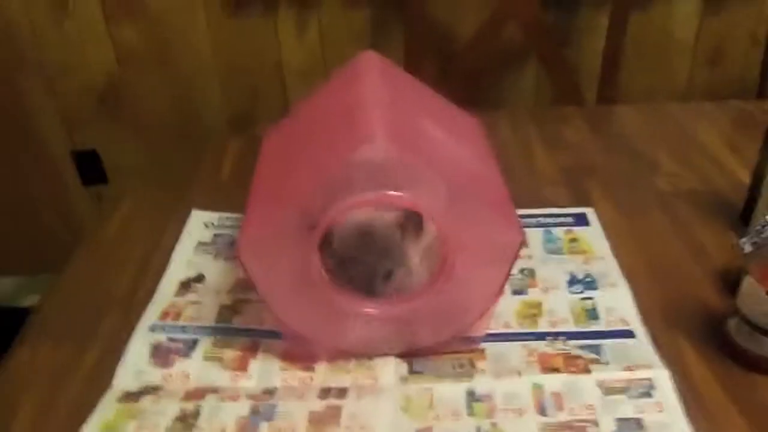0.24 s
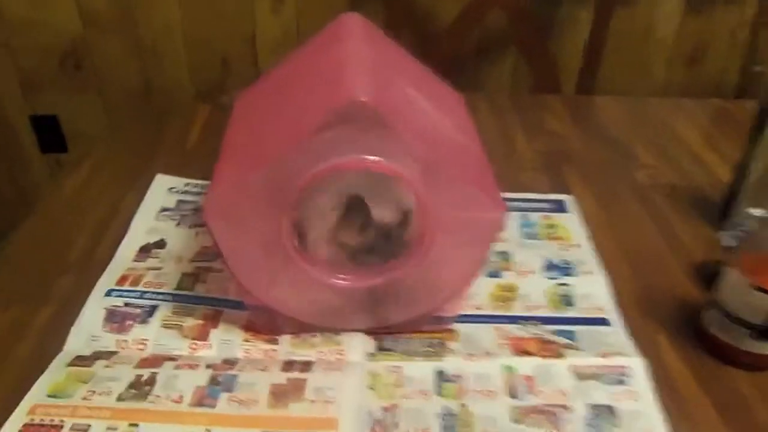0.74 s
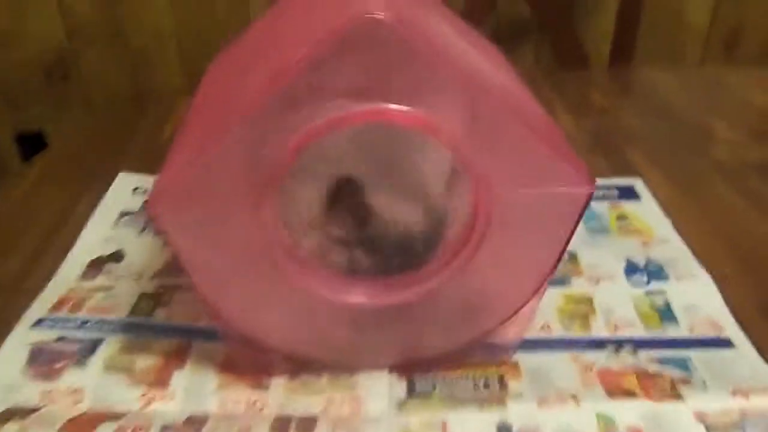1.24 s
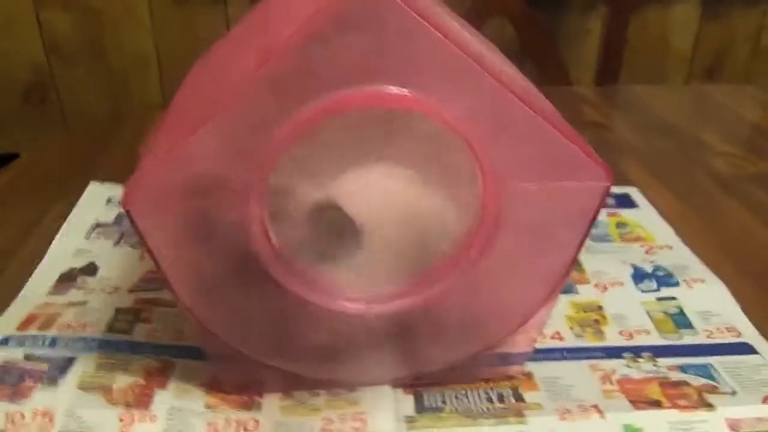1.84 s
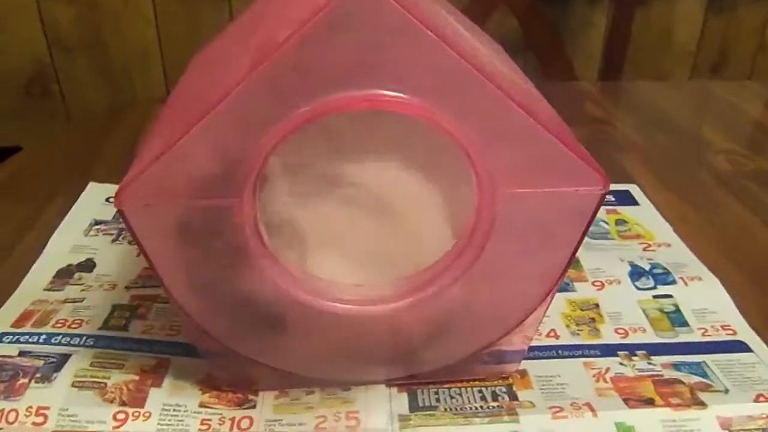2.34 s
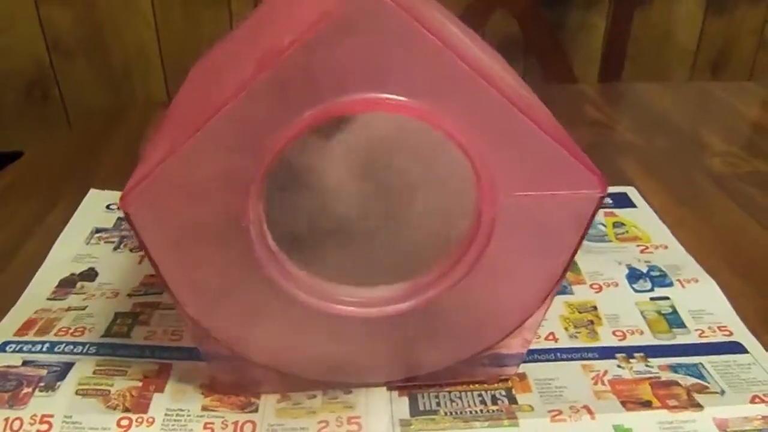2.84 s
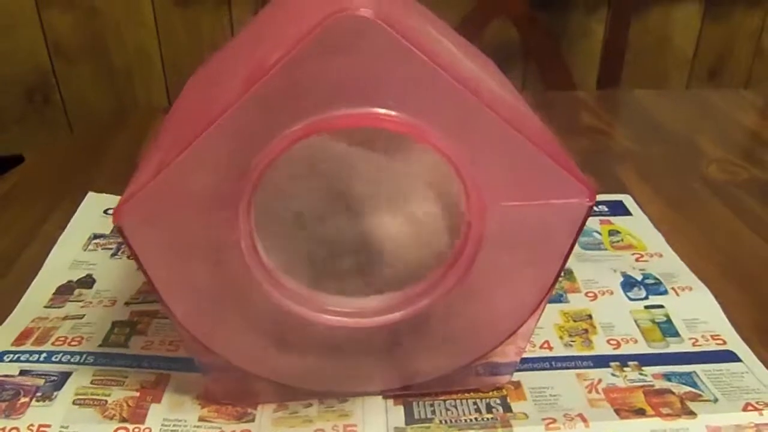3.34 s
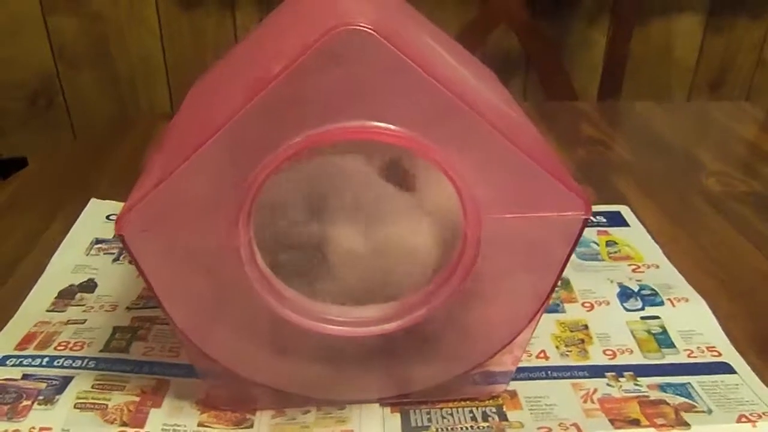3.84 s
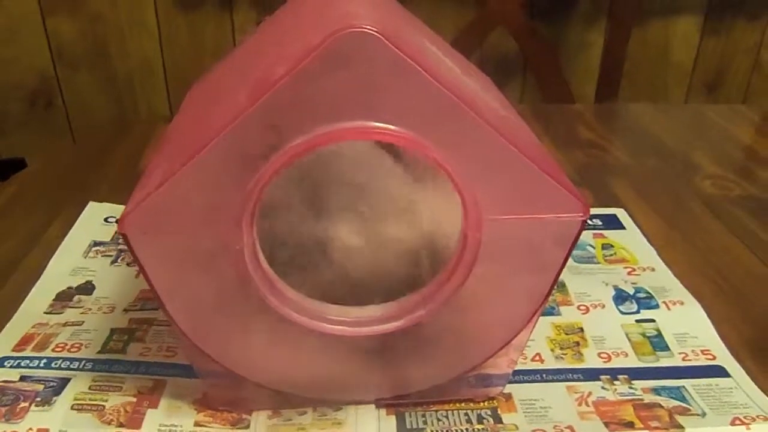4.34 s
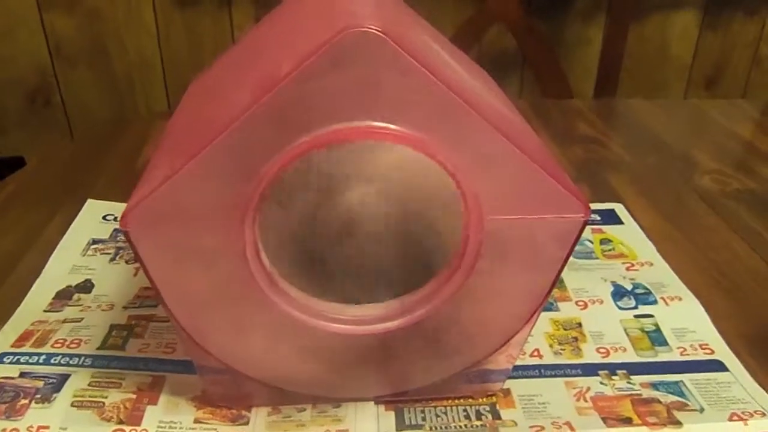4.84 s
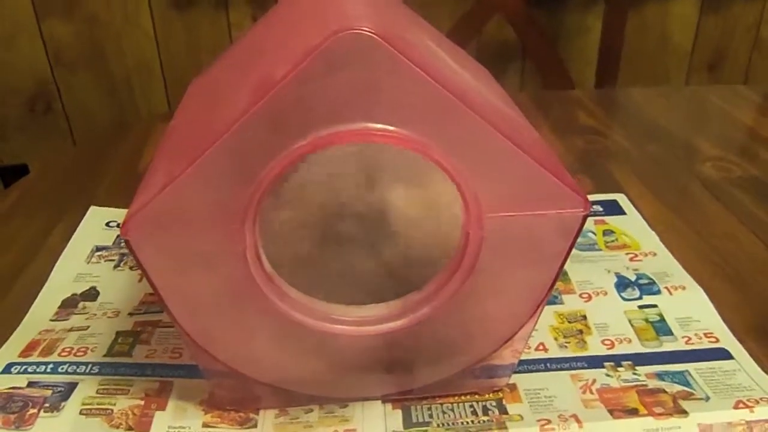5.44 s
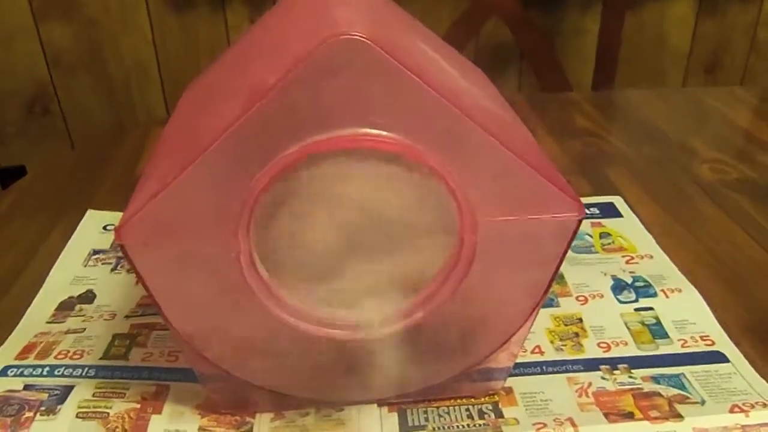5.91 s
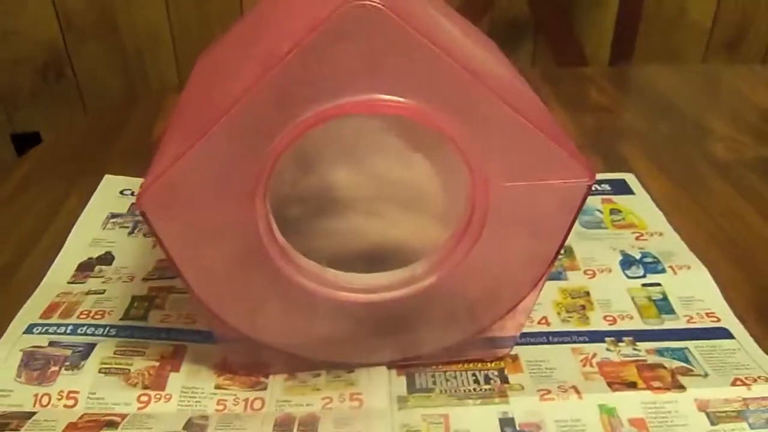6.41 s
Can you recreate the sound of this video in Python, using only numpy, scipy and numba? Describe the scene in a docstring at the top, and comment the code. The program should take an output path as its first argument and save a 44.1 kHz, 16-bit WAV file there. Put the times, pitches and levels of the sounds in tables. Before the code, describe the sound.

A chinchilla rolls in a plastic dust bath, making irregular hollow thumps, scratchy claw scrapes and soft hissing dust.

```python
"""A quiet room, a hollow plastic bath house on a table, a chinchilla rolling and scrabbling inside.
Body and feet thump the walls, which ring in a few low modes over the boom of the enclosed air.
Claws scrape and squeak, dust hisses against the plastic, grit ticks, a small metal thing tinkles once.
A dull scuff comes last. Short room echoes and a low room tone lie underneath."""
import sys
import numpy as np
from scipy import signal
from scipy.fft import rfft, irfft
from scipy.io import wavfile
from scipy.ndimage import uniform_filter1d
from numba import njit

SR = 44100
rng = np.random.default_rng(int(sys.argv[2]) if len(sys.argv) > 2 else 0)


def generate_wav(sig):
    """Save sig (samples, or channels by samples) to the path in sys.argv[1] as 16-bit PCM at SR."""
    pcm = np.round(np.clip(np.atleast_2d(sig).T, -1, 1) * 32767).astype(np.int16)
    wavfile.write(sys.argv[1], SR, pcm)


N = 294345
HOP = 40   # samples per step of slow curves

# body against wall: start_s, level_db, cavity_boom_db, hardness_db
THUMPS = [(.028, -20, -21, -1.5), (.085, -15.5, 1.5, 1.5), (.12, -25, -3, -5), (.15, -24.5, 10, 15),
          (.38, -34.5, -17, -2), (.494, -42, -4, -12), (0.657, -27.5, -16, -6), (.726, -31, 0, 3),
          (.811, -25.5, -4, 2), (.889, -22, -2, 1.5), (.95, -28, 9, 10), (1.027, -42, 12, 3),
          (1.153, -34, -6, 0), (1.238, -16.5, -1.5, 2), (1.307, -22.5, -5, 3), (1.437, -25.5, 1, -10),
          (1.552, -33.5, 13.5, -5), (1.599, -9.5, -12, 2.5), (1.652, -12, -13, 6), (1.707, -22.5, -27, 7),
          (1.756, -21, 2.5, -11), (1.79, -6.5, 0, 0), (1.808, -15, -22, 6), (1.827, -12, -9, -2),
          (1.898, -31, -8, 15), (1.977, -19, -0.5, 1), (2.077, -23.5, -8, -5), (2.311, -14.5, -2.5, 1.5),
          (2.341, -18.5, -1.5, 2), (2.486, -22, -19, -4), (2.587, -16.5, 1, -1), (2.645, -18.5, -9, -3),
          (2.696, -26.5, -13, -14), (2.757, -14.5, -24, 4.5), (2.788, -12, -1, 3), (2.858, -30.5, 4, 14),
          (2.937, -15, -20, 4), (2.968, -18.5, 2, -6), (3.051, -13, 7, -1.5), (3.227, -21, 4.5, 3),
          (3.321, -22.5, 6, 0.5), (3.376, -29, 8, 3), (3.408, -24.5, 4, 4), (3.531, -37.5, 12.5, -7),
          (3.601, -39, -12, -10), (3.805, -22, -0.5, -3.5), (3.932, -33.5, 9.5, -10), (3.997, -28, 2, 1),
          (4.051, -27.5, 7.5, 5), (4.195, -32, 13.5, -6), (4.338, -32, 6, 0.5), (4.415, -25.5, -29, -11),
          (4.524, -22, 6.5, -2), (4.609, -25.5, 8, -4), (4.652, -5, -14, 3), (4.699, -13.5, 2, 11),
          (4.797, -24, -12, -6), (4.888, -19, 3.5, 0), (4.97, -28, -4, 3), (5.113, -33, 4.5, -19),
          (5.162, -30, 6.5, -13), (5.221, -37, 15.5, -8), (5.298, -29.5, 12, 0), (5.397, -31.5, 13, -9),
          (5.481, -32, 0, -11), (5.594, -21.5, -12, -25), (5.678, -23, -8, -1), (5.76, -26.5, 1.5, -7),
          (5.808, -32, 3, 10), (5.857, -11.5, 0.5, 1.5), (6.01, -30.5, -3, -7), (6.088, -15, -5.5, -2),
          (6.159, -24.5, -17, -7), (6.191, -20.5, 6.5, 3), (6.256, -25.5, 12, 0), (6.492, -35.5, 5.5, -3)]
# house modes, the lowest being air breathing through the door: pitch_hz, gain_db, free_t60_s
HOUSE_MODES = [(142.4, -6, 0.38), (208, -12, 0.61), (230.1, -3.5, 0.32), (266.5, -1, 0.088),
               (278, 1, 0.029), (295.2, -6.5, 0.25), (332.7, -15, 0.4), (342.7, -10, 0.21),
               (420, -33, 0.29), (476, 0.5, 0.051), (528, -30, 0.34), (649, -11, 0.1), (763, -18.5, 0.21),
               (852, -6.5, 0.039), (982, -16, 0.12), (1100, -20, 0.11), (1300, -30, 0.18),
               (1330, -54, 0.099)]
# wall mode that blooms a moment after each blow: pitch_hz, gain_db, free_t60_s
LATE_MODE = (585.6, -14.5, 0.039)
# steady stirring between strokes: time_s, claws_db, dust_db, drag_db
STIR = [(0.0, -55.5, -53.5, -27), (0.43, -53, -57, -47), (0.62, -55, -58.5, -59), (0.85, -54, -56.5, -41.5),
        (1.36, -53.5, -53, -35), (1.8, -54, -49.5, -39), (2.12, -61.5, -60, -48), (2.93, -56.5, -56, -35.5),
        (3.2, -60.5, -62.5, -38), (3.7, -59, -60.5, -54), (3.9, -59, -59.5, -48), (4.17, -61.5, -64, -43),
        (4.4, -60, -57, -48), (4.75, -49.5, -49.5, -37), (5.07, -57, -60, -49), (6.08, -55, -52.5, -43),
        (6.3, -62.5, -63, -44), (6.67, -66, -67.5, -42.5)]
# paw and body strokes through the dust: start_s, length_s, claws_db, dust_db
STROKES = [(0.03, 0.068, -59, -54.5), (0.085, 0.13, -48, -50.5), (0.364, 0.03, -51.5, -51),
           (0.448, 0.044, -57.5, -53), (0.521, 0.028, -56.5, -47.5), (0.613, 0.048, -53, -62),
           (0.681, 0.12, -53.5, -52.5), (0.812, 0.064, -54, -51), (0.884, 0.034, -49, -52),
           (0.955, 0.14, -51.5, -49.5), (1.154, 0.04, -56, -54), (1.214, 0.093, -48, -49),
           (1.36, 0.09, -53, -52.5), (1.469, 0.083, -58.5, -48), (1.588, 0.03, -45.5, -50),
           (1.645, 0.051, -50, -44.5), (1.757, 0.096, -48.5, -45), (1.95, 0.042, -57, -57),
           (2.166, 0.031, -62, -57), (2.303, 0.079, -52.5, -59), (2.519, 0.018, -53.5, -56),
           (2.602, 0.089, -55, -54.5), (2.75, 0.094, -50.5, -56), (2.915, 0.06, -52, -56.5),
           (3.044, 0.096, -52.5, -56), (3.221, 0.02, -59, -65), (3.313, 0.13, -56, -60.5),
           (3.49, 0.07, -53, -56.5), (3.574, 0.03, -54, -55), (3.767, 0.023, -56, -59),
           (3.854, 0.13, -55, -54), (4.046, 0.036, -54, -57), (4.228, 0.1, -55.5, -63),
           (4.401, 0.035, -55, -71), (4.474, 0.072, -46, -50), (4.646, 0.041, -43.5, -51),
           (4.73, 0.17, -54, -54), (4.948, 0.027, -46.5, -56), (5.105, 0.049, -53.5, -57),
           (5.188, 0.079, -47.5, -50), (5.285, 0.091, -46.5, -48), (5.41, 0.026, -45.5, -50),
           (5.477, 0.13, -49.5, -55), (5.654, 0.033, -52, -65), (5.8, 0.027, -48, -50.5),
           (5.847, 0.097, -50, -56.5), (6.006, 0.071, -55.5, -38.5), (6.078, 0.12, -49.5, -46.5),
           (6.369, 0.032, -58.5, -70), (6.574, 0.077, -49, -65.5)]
# claw rasp colour: freq_hz, density_db
RASP_SPECTRUM = [(350, -17), (600, 1), (679, 0), (952, 2), (1070, 0.5), (1390, -2), (1550, 0.5), (2960, -2),
                 (3670, -4.5), (5000, -17.5), (6500, -11), (11000, -120)]
# wall modes rung by catching claws: pitch_hz, gain_db, t60_s
SCRATCH_MODES = [(1407, -27, 0.022), (2170, -30, 0.0058), (2960, -21.5, 0.007), (3460, -28, 0.0035)]
# dust hiss colour: freq_hz, density_db
DUST_SPECTRUM = [(2000, -15.5), (3500, -2), (5000, 2.5), (7000, 1.5), (9000, 1), (14000, -0.5),
                 (16000, -12)]
# puffs of the finest dust: start_s, length_s, top_lift_db
PUFFS = [(0.041, .04, 9), (0.377, .04, 5), (0.792, 0.07, 7.5), (5.798, 0.017, 10)]
# room tone colour: freq_hz, density_db
ROOM_SPECTRUM = [(12, -30), (20, 21.5), (65, 21.5), (386, -19), (522, -5), (1010, -2), (1250, -25),
                 (3370, -23.5), (3760, -18), (14000, -31)]
# grit and claw ticks: start_s, peak_db, centre_hz
TICKS = [(.031, -37, 2380), (.099, -28.5, 2600), (0.165, -26, 7500), (.389, -35, 5700), (.529, -33, 3120),
         (.74, -38, 4200), (.902, -32, 2000), (1.154, -32, 1710), (1.241, -37, 2200), (1.604, -27.5, 4000),
         (1.655, -37, 1600), (1.754, -34, 1300), (1.771, -40, 8200), (1.793, -24.5, 5500),
         (1.814, -22, 8800), (1.836, -22.5, 7500), (1.842, -28, 8200), (1.896, -30.5, 1530),
         (1.922, -32.5, 6400), (1.962, -32.5, 8900), (2.101, -40, 11500), (2.31, -34, 1900),
         (2.34, -25.5, 1330), (2.486, -39.5, 1400), (2.535, -33, 3880), (2.589, -34, 1180),
         (2.659, -27.5, 2810), (2.758, -27.5, 2700), (2.76, -31, 8000), (2.921, -34, 11300),
         (2.951, -40, 1200), (3.063, -40.5, 1100), (3.229, -35.5, 2600), (3.674, -37, 2720),
         (4.492, -29, 3300), (4.55, -31, 3270), (4.657, -19.5, 1300), (4.667, -19.5, 4470),
         (4.889, -33.5, 2600), (4.935, -33.5, 2800), (4.997, -36, 3200), (5.039, -27.5, 7850),
         (5.116, -40, 3600), (5.291, -29, 2600), (5.421, -31, 1700), (5.48, -35, 1500), (5.807, -33, 6100),
         (6.005, -22, 9300), (6.015, -18, 7600), (6.027, -17, 8500), (6.037, -16.5, 6960),
         (6.052, -18, 5400), (6.073, -25, 8000), (6.091, -24, 4130), (6.113, -29, 4600), (6.19, -42, 3300),
         (6.223, -32, 9800), (6.428, -41, 7100), (6.509, -46, 4800)]
# strikes on the metal thing: start_s, level_db
METAL_STRIKES = [(.132, -45), (0.151, -42), (0.167, -42), (.195, -48), (.21, -46)]
# its modes: pitch_hz, gain_db, t60_s
METAL_MODES = [(5310, -5, 0.11), (10070, -3, 0.15), (13300, -4, .06)]
# claw slips on the smooth wall: start_s, level_db, pitch_hz, length_s
SQUEAKS = [(1.066, -43, 3430, 0.011), (1.106, -40, 3050, 0.0081), (3.777, -41, 3520, 0.013),
           (4.956, -34.5, 1526, 0.024), (4.967, -40.5, 1950, 0.014)]


def from_db(db):
    """Decibels to gain."""
    return np.exp(np.asarray(db) * (np.log(10) / 20))


def rms_one(x):
    """Scale to rms 1."""
    return x / np.sqrt(np.mean(x ** 2) + 1e-20)


def butter(x, order, edge_hz, kind):
    """Butterworth filter."""
    return signal.sosfilt(signal.butter(order, edge_hz, kind, fs=SR, output="sos"), x)


def drift(rate_hz):
    """Low-passed noise, one value per hop; rms 1."""
    pole = np.exp(-2 * np.pi * rate_hz * HOP / SR)
    noise = rng.standard_normal(N // HOP + 2002)
    return rms_one(signal.lfilter([1], [1, -2 * pole, pole * pole], noise)[2000:])


def flicker(slow_db):
    """Decibels per hop to gain per sample."""
    return np.interp(np.arange(N) / HOP, np.arange(len(slow_db)), from_db(slow_db))


def swells(starts_s, lengths_s, levels_db, attack_s=0.0061, release_s=0.021):
    """Power sum of rise-hold-release envelopes."""
    t = np.arange(N // HOP + 1) * HOP / SR
    power = 0
    for start_s, length_s, gain in zip(starts_s, lengths_s, from_db(levels_db)):
        age_s = np.maximum(t - start_s, 0)
        rise = 1 - np.exp(-age_s / attack_s)
        fall = np.exp(-np.maximum(age_s - length_s, 0) / release_s)
        power += (gain * rise * fall) ** 2
    return np.interp(np.arange(N) / SR, t, np.sqrt(power))


def grains(per_s, spread_db):
    """Random clicks of uneven size and sign; rms 1."""
    out, count = np.zeros(N), int(per_s * N / SR)
    sizes = from_db(spread_db * np.minimum(rng.exponential(1, count), 5))
    signs = rng.choice([-1, 1], count)
    out[rng.integers(0, N, count)] = sizes * signs
    return rms_one(out)


def coloured(source, spectrum, flicker_db, flicker_hz):
    """Shape to a spectrum; bands two octaves apart flicker partly independently; rms 1."""
    freq_hz, density_db = np.transpose(spectrum)
    size = (N // 4096 + 1) * 4096
    bin_pos = np.log2(np.arange(1, size // 2 + 2) * SR / size) / 2
    knot_pos = np.log2(freq_hz) / 2
    shaped = rfft(source, size) * from_db(np.interp(bin_pos, knot_pos, density_db))
    out, common = 0, drift(flicker_hz)
    for centre in range(int(knot_pos[0]), int(knot_pos[-1]) + 2):
        band = irfft(shaped * np.maximum(1 - np.abs(bin_pos - centre), 0), size)[:N]
        out += band * flicker(flicker_db * (common + 1.8 * drift(flicker_hz)))
    return rms_one(out)


def ring(clicks, pitch_hz, t60_s):
    """One mode: a unit click starts a decaying unit sine."""
    r, w = from_db(-60 / (t60_s * SR)), 2 * np.pi * pitch_hz / SR
    return signal.lfilter([0, np.sin(w)], [1, -2 * r * np.cos(w), r * r], clicks + 1e-18)


@njit
def ring_damped(blows, pitch_hz, decay):
    """One mode with a time-varying decay factor per sample."""
    w = 2 * np.pi * pitch_hz / SR
    out, cos_w, sin_w = np.zeros(len(blows)), np.cos(w), np.sin(w)
    for i in range(2, len(blows)):
        out[i] = 2 * decay[i] * cos_w * out[i - 1] - decay[i] ** 2 * out[i - 2] + sin_w * blows[i - 1]
    return out


def patter(drag, thump_at, thump_db, rock_t60_s=0.32):
    """Small bumps: the body drags, and the house rocks on the table after each thump."""
    kicks = np.zeros(N)
    kicks[thump_at] = from_db(thump_db - 50)
    rocking = signal.lfilter([1], [1, -from_db(-60 / (rock_t60_s * SR))], kicks + 1e-18)
    dragging = drag * from_db(-42) * flicker(4.17 * drift(rate_hz=22.4))
    return (dragging + rocking) * grains(per_s=400, spread_db=3.5)


def house(drag, cavity_top_hz=175, upper_hz=400, contact_lag_s=0.00017, late_s=0.014):
    """Thumps and patter ring the plastic walls and the air inside."""
    start_s, level_db, boom_db, hardness_db = np.transpose(THUMPS)
    thump_at = ((start_s + contact_lag_s) * SR).astype(int)
    last_thump = np.maximum(np.searchsorted(thump_at, np.arange(N), "right") - 1, 0)
    # a stronger blow leaves the body pressed on the wall: shorter ring
    t60_share = np.clip(0.39 - 0.011 * level_db, 0.15, 1.5)
    modes = HOUSE_MODES + [LATE_MODE]
    spot_db = 2.0 * rng.standard_normal((len(THUMPS), len(modes)))   # each blow lands elsewhere
    bumps = patter(drag, thump_at, level_db)
    out = np.zeros(N)
    for k, (pitch_hz, gain_db, free_t60_s) in enumerate(modes):
        late = k == len(HOUSE_MODES)
        tilt_share, bump_share = (0.69, 0.38) if late else (1, 1)
        tilt_db = boom_db if pitch_hz < cavity_top_hz else hardness_db if pitch_hz > upper_hz else 0
        blows = bump_share * bumps
        blows[thump_at] -= from_db(level_db + tilt_share * tilt_db + spot_db[:, k] - 11)
        if pitch_hz < cavity_top_hz:   # walls push the air: the boom swells late
            blows = 0.023 * ring(blows, pitch_hz=140.6, t60_s=0.063)
        elif pitch_hz < upper_hz:   # fur and pads yield: the blow swells over a cycle
            blows = 0.033 * ring(blows, pitch_hz=281.7, t60_s=0.018)
        else:   # pads dull the blow
            blows = signal.lfilter([0.3], [1, -0.7], blows)
        if late:
            blows = 0.08 * ring(np.roll(blows, int(late_s * SR)), pitch_hz, t60_s=0.041)
        decay = from_db(-60 / (free_t60_s * t60_share * SR))
        out += from_db(gain_db) * ring_damped(blows, pitch_hz, decay[last_thump])
    soft = butter(out, 1, 600, "low")
    return butter(soft, 4, 112, "high")   # a small shell radiates no deep bass


def claws(effort):
    """A dense rasp, plus clumps of sparser catches that ring the wall."""
    rasp = coloured(grains(per_s=4000, spread_db=3.0), RASP_SPECTRUM, flicker_db=2.04, flicker_hz=50)
    clumps = flicker(3.7 * drift(rate_hz=35))
    catches = sum(from_db(gain_db) * ring(grains(per_s=250, spread_db=2.5), pitch_hz, t60_s)
                  for pitch_hz, gain_db, t60_s in SCRATCH_MODES)
    return effort * (rasp + clumps * catches)


def dust(cloud, split_hz=9500, base_lift_db=2):
    """Dense grains hiss on the plastic; puffs of finer dust lift the top."""
    hiss = coloured(grains(per_s=9000, spread_db=2.5), DUST_SPECTRUM, flicker_db=1.27, flicker_hz=26)
    coarse = butter(hiss, 3, split_hz, "low")
    fine = butter(hiss, 3, split_hz, "high")
    lift = np.hypot(from_db(base_lift_db), swells(*np.transpose(PUFFS)))
    return cloud * (coarse + lift * fine)


def room_echoes(x, t60_s=0.38, damping_hz=5000):
    """Reflections: six feedback delays of unrelated lengths, duller each pass."""
    size = (N // 4096 + 9) * 4096
    freq_hz = np.arange(size // 2 + 1) * SR / size
    damping = 1 / np.sqrt(1 + (freq_hz / damping_hz) ** 2)
    lags = (rng.uniform(0.0094, 0.03, 6) * SR).astype(int)
    response = 0
    for k, lag_s in enumerate(lags / SR):
        loop = from_db(-60 * lag_s / t60_s) * damping * np.exp(-2j * np.pi * freq_hz * lag_s)
        response += (-1) ** k * loop / (1 - loop)
    return irfft(rfft(x, size) * response, size)[:N]


def room_tone():
    """Low, nearly steady rumble with faint hiss."""
    return coloured(rng.standard_normal(N), ROOM_SPECTRUM, flicker_db=0.5, flicker_hz=1.3)


def ticks(t60_s=0.02, snap_s=0.00077):
    """Grit and claw hits: dying crackles, sharpest at first contact, wider in band when higher."""
    t = np.arange(2000) / SR
    out = np.zeros(N + len(t))
    envelope = from_db(-60 * t / t60_s) * (1 + 1.8 * np.exp(-t / snap_s))
    for start_s, peak_db, centre_hz in TICKS:
        width_oct = 1.18 + 0.26 * np.log2(centre_hz / 1000)
        edge_ratio = 2 ** (width_oct / 2)
        band_hz = [centre_hz / edge_ratio, min(centre_hz * edge_ratio, 20000)]
        tick = butter(rng.standard_normal(len(t)) * envelope, 2, band_hz, "band")
        at = int(start_s * SR)
        out[at:at + len(t)] += from_db(peak_db) * tick / np.abs(tick).max()
    return out[:N]


def tinkle():
    """Light strikes ring a small piece of metal."""
    clicks = np.zeros(N)
    for start_s, level_db in METAL_STRIKES:
        clicks[int(start_s * SR)] = from_db(level_db)
    return sum(from_db(gain_db) * ring(clicks, pitch_hz, t60_s)
               for pitch_hz, gain_db, t60_s in METAL_MODES)


def squeaks():
    """A claw slips on the smooth wall: a short rough tone."""
    out = np.zeros(N)
    for start_s, level_db, pitch_hz, length_s in SQUEAKS:
        t = np.arange(int(length_s * SR)) / SR
        roughness = 1 + 2.2 * uniform_filter1d(rng.standard_normal(4000), size=30)[:len(t)]
        envelope = from_db(level_db) * np.sin(np.pi * t / length_s)
        at = int(start_s * SR)
        out[at:at + len(t)] += envelope * roughness * np.sin(2 * np.pi * pitch_hz * t)
    return out


def scuff(band_hz=(550, 1500)):
    """One grainy rub, duller than the claws."""
    rub = rms_one(butter(grains(per_s=3000, spread_db=3.0), 2, band_hz, "band"))
    return rub * swells(starts_s=[6.585], lengths_s=[0.09], levels_db=[-53])


def scene(drag_over_claws_db=8.5, echo_db=-18, tone_db=-54):
    """Stirring and strokes drive body, claws and dust; small sounds and the room are added. Mono."""
    time_s, *stir_db = np.transpose(STIR)
    t = np.arange(N) / SR
    stir_claws, stir_dust, stir_drag = [from_db(np.interp(t, time_s, db)) for db in stir_db]
    start_s, length_s, claws_db, dust_db = np.transpose(STROKES)
    scraping = swells(start_s, length_s, claws_db)
    drag = np.hypot(stir_drag, from_db(drag_over_claws_db) * scraping)
    effort = np.hypot(stir_claws, scraping)
    cloud = np.hypot(stir_dust, swells(start_s, length_s, dust_db))
    direct = house(drag) + claws(effort) + dust(cloud) + ticks() + tinkle() + squeaks() + scuff()
    return (direct + from_db(tone_db) * room_tone() + from_db(echo_db) * room_echoes(direct))[None]


def record(dry, step_hz=14150, cutoff_hz=15050):
    """Two steep low-passes: the top steps down, then is cut."""
    stepped = signal.sosfilt(signal.cheby2(18, 36, step_hz, fs=SR, output="sos"), dry)
    return signal.sosfilt(signal.cheby2(24, 60, cutoff_hz, fs=SR, output="sos"), stepped)


dry = scene()
out = record(dry)
generate_wav(out)
```